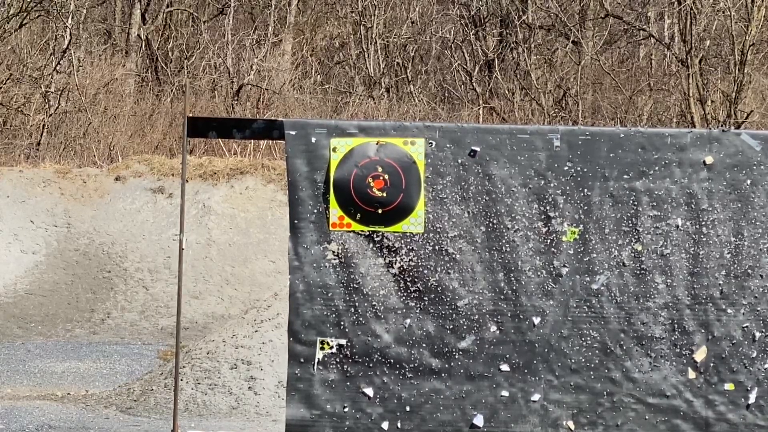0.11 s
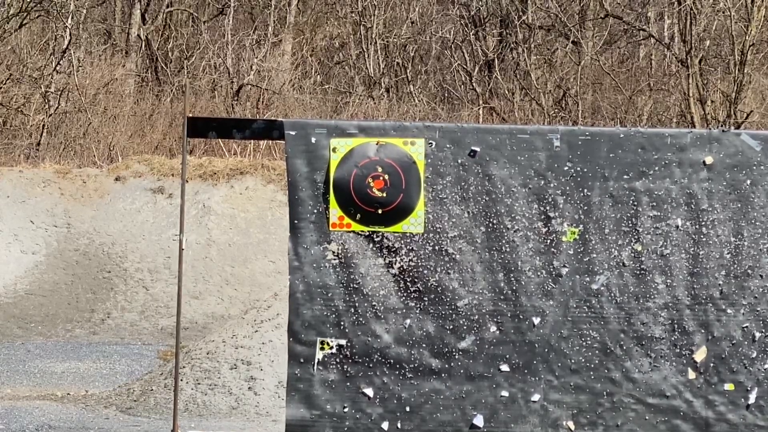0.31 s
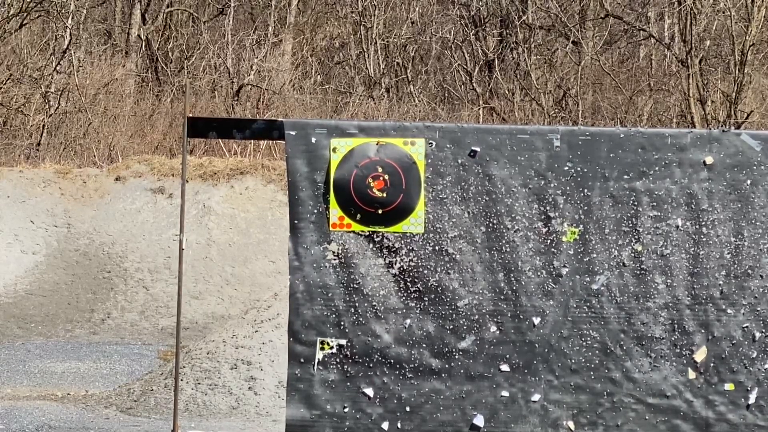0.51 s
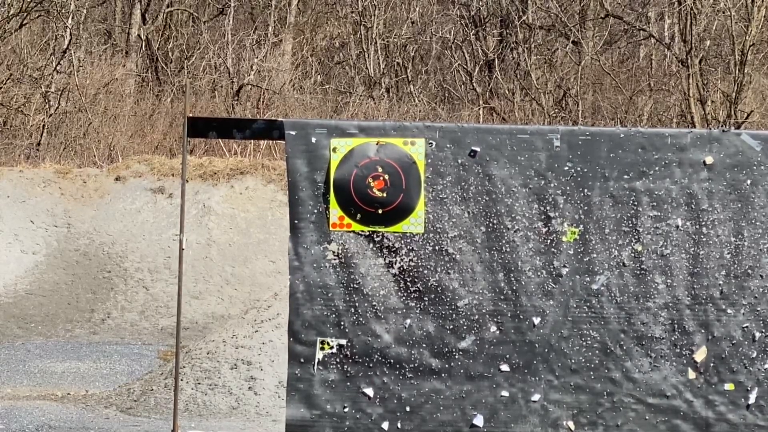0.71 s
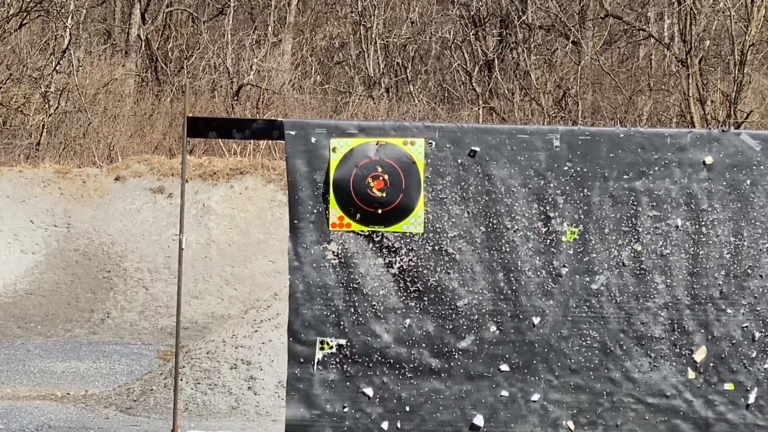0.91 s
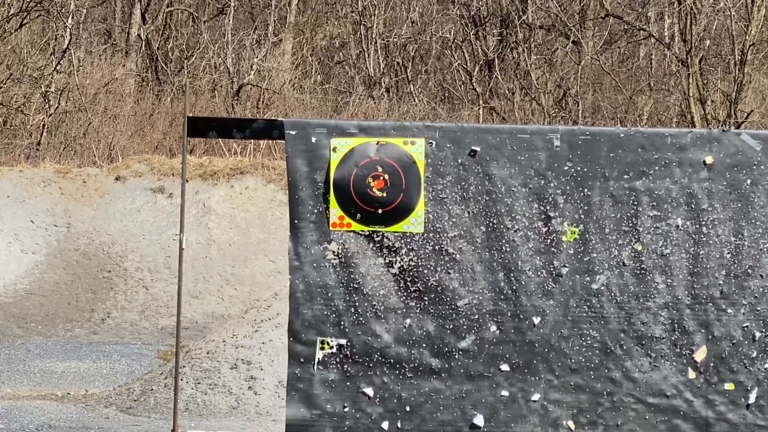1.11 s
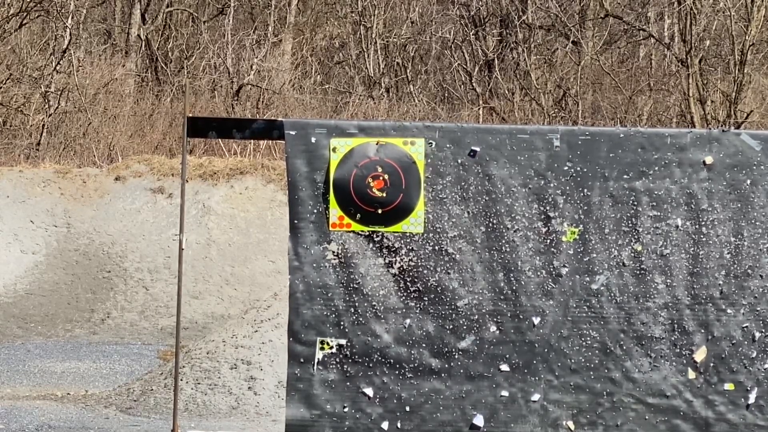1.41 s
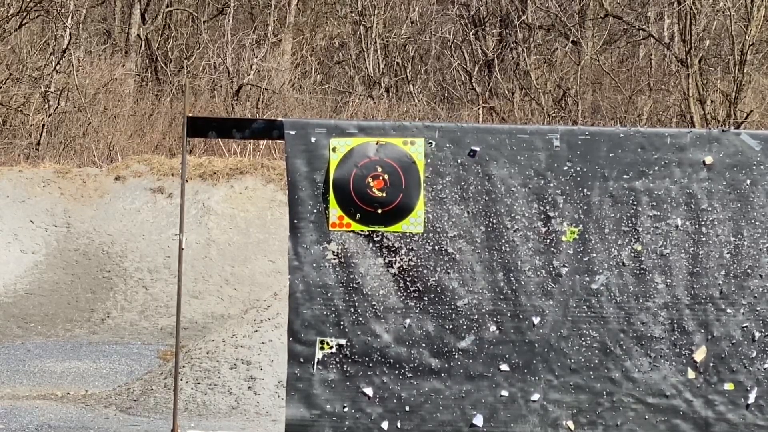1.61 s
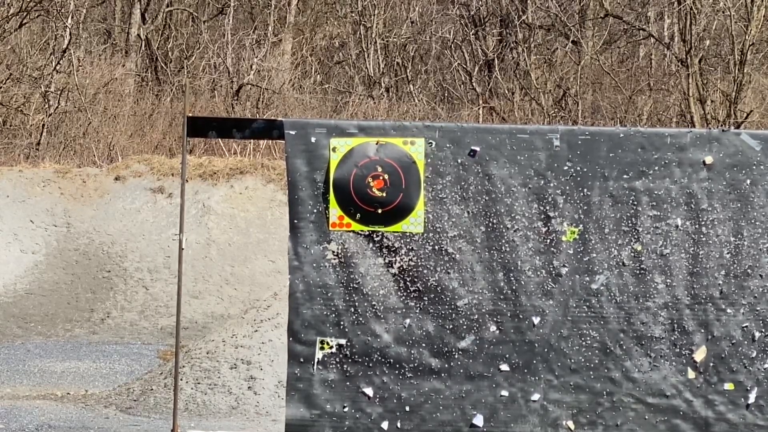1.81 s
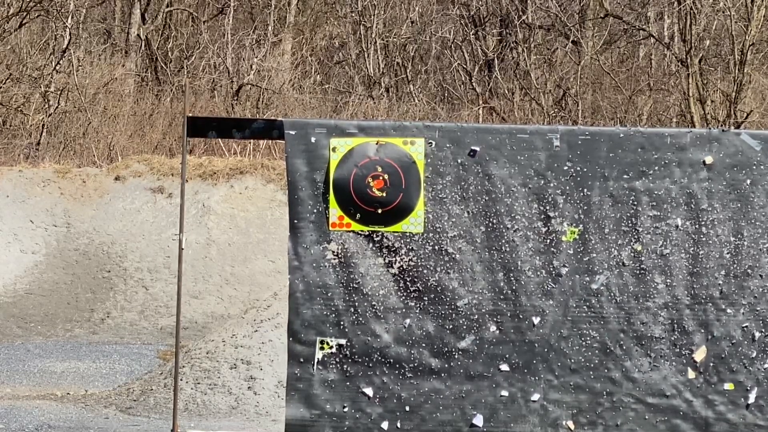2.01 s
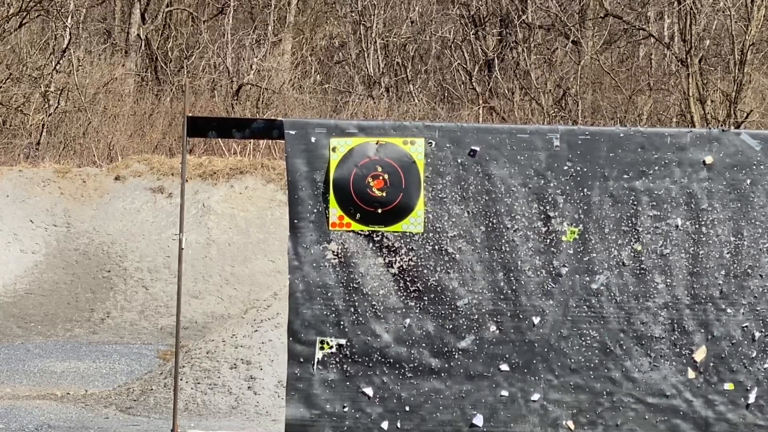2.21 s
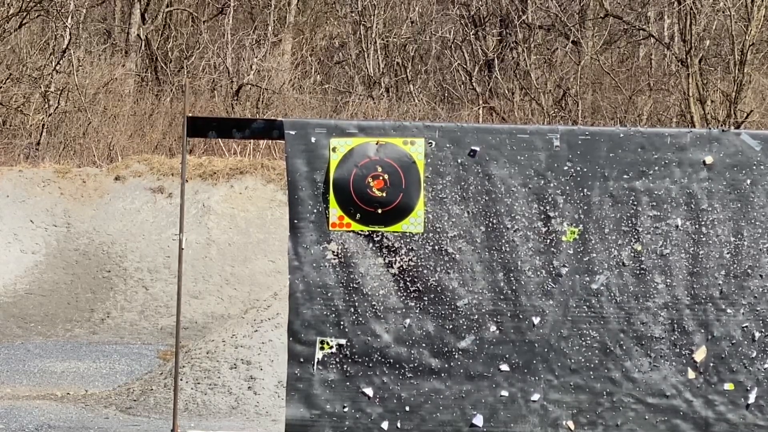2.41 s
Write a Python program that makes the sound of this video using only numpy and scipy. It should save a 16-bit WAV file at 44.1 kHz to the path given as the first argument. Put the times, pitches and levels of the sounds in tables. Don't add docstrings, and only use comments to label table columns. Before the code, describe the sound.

Single sharp muffled pistol shot with metallic slide clack, outdoor echo, and a bouncing brass case

```python
import sys
import numpy as np
from scipy import signal
from scipy.io import wavfile

SR = 44100
rng = np.random.default_rng(int(sys.argv[2]) if len(sys.argv) > 2 else 0)


def gain_from_db(level_db):
    decades = np.asarray(level_db, float) / 20
    return 10 ** decades


def bounce(signal):
    frames = np.transpose(np.atleast_2d(signal))
    limited = np.clip(frames, -1, 1)
    pcm = np.round(limited * 32767).astype(np.int16)
    wavfile.write(sys.argv[1], SR, pcm)


N = 114660
TIME = np.arange(N) / SR
SHOT_S = .2238


def at_hz(points, hz):
    table_hz, values = np.array(points).T
    return np.interp(np.log(hz), np.log(table_hz), values)


def rms_one(x):
    return x / np.sqrt(np.mean(x ** 2) + 1e-20)


def drift(rate_hz):
    hop = 40
    pole = np.exp(-2 * np.pi * rate_hz * hop / SR)
    noise = rng.standard_normal(N // hop + 2002)
    slow = signal.lfilter([1], [1, -2 * pole, pole * pole], noise)[2000:]
    return np.interp(np.arange(N) / hop, np.arange(len(slow)), rms_one(slow))


def clicks(times, gains):
    out = np.full(N, 1e-18)
    np.add.at(out, (np.asarray(times) * SR).astype(int), gains)
    return out


def ring(x, hz, t60):
    radius, turn = gain_from_db(-60 / (t60 * SR)), 2 * np.pi * hz / SR
    return signal.lfilter([0, np.sin(turn)], [1, -2 * radius * np.cos(turn), radius * radius], x)


def struck(events):
    return sum(ring(clicks([s], gain_from_db(db)), hz, t60) for s, hz, db, t60 in events)


def dying(start, rise, t60, hold=0):
    t = np.maximum(TIME - start, 0)
    return np.minimum(t / rise, 1) * gain_from_db(-60 * np.maximum(t - rise - hold, 0) / t60)


def bands(spectrum, shape):
    lowest, highest = spectrum[0][0], spectrum[-1][0]
    edges = lowest * 2 ** np.arange(0, np.log2(highest / lowest) + .2, 1 / 3)
    white = rng.standard_normal((2, N + 8000))
    out, power = 0, 0
    for k, (low, high) in enumerate(zip(edges, np.minimum(edges[1:], .45 * SR))):
        hz = np.sqrt(low * high)
        band_pass = signal.butter(2, [low, high], "band", fs=SR, output="sos")
        band = gain_from_db(at_hz(spectrum, hz)) * signal.sosfilt(band_pass, white[k % 2])[-N:]
        out = out + band * shape(hz)
        power += np.mean(band ** 2)
    return out / np.sqrt(power)


# (time [s], peak level [dB], pulse length [ms])
PULSES = [(.2241, -14, .12), (.2255, -2.5, .13), (.2267, -2.5, .12), (.2281, -7, .35), (.2292, -8, .15),
          (.2301, -5, .15), (.2319, -10, .4), (.2347, -11, .2), (.2363, -11, .2), (.2443, -16, .3),
          (.2550, -20, .4), (.2635, -24, .17), (.2828, -24, .12)]


def pressure_pulses():
    out = np.zeros(N)
    for s, db, ms in PULSES:
        t = (TIME - s) / (ms / 1000)
        out += gain_from_db(db) * 2.33 * t * np.exp(-2 * t ** 2)
    return out


# (frequency [Hz], level [dB], t60 [s])
STEEL_MODES = [(640, -24, .04), (809.6, -22.5, .04), (854, -25.5, 0.055), (1500, -24, 0.023),
               (1746, -21.5, 0.078), (2599.4, -20.5, .02), (2971, -21, .02), (4324, -21.5, 0.02),
               (4760, -20, .015), (6020, -38, .2), (6650, -24.5, 0.017), (10020, -31, 0.05)]
# (time [s], frequency [Hz], level [dB], t60 [s])
SLIDE_STOPS = [
    (0.2286, 5950, -10.5, 0.01),
    (0.2293, 6000, -10, 0.0091),
    (0.2327, 5900, -14.5, 0.011),
    (.2625, 10020, -31.5, 0.08),
    (0.2631, 6020, -27.5, 0.13),
]


def steel():
    s, db, _ = np.transpose(PULSES)
    out = struck(SLIDE_STOPS)
    for hz, mode_db, t60 in STEEL_MODES:
        blow_db = db + mode_db - 2 + rng.normal(0, 4, len(s))
        sign = rng.choice([-1, 1], len(s))
        out += ring(clicks(s, gain_from_db(blow_db) * sign), hz, t60)
    return out


# (frequency [Hz], density [dB per Hz])
GAS_COLOUR = [(180, -40), (300, -16), (1090, -16.5), (1740, -5), (4030, -9.5), (5830, -0.5), (10500, -19),
              (15200, -22.5), (16500, -35)]


def gas():
    spits = sum(gain_from_db(db) * dying(s, .00044, .011) for s, db, _ in PULSES)
    jet = gain_from_db(-9) * bands(GAS_COLOUR, lambda hz: spits)
    bright = np.diff(rng.standard_normal(N + 1))
    return jet + gain_from_db(-20) * bright * dying(SHOT_S, .0003, .012, hold=.001)


def muzzle_puff():
    start_s, pitch_hz = .2312, 125
    swing = np.sin(2 * np.pi * pitch_hz * (TIME - start_s))
    return -gain_from_db(-18.5) * swing * dying(start_s, .0046, .03, hold=.009)


# (time [s], level [dB], frequency [Hz], t60 [s])
BANK_THUMPS = [
    (0.3887, -36, 454, 0.026),
    (.3885, -32.5, 850, 0.0087),
    (0.3965, -42, 151, 0.065),
    (0.41, -43.5, 308, 0.023),
]


def bank_thumps():
    soft = signal.butter(2, 1500, fs=SR, output="sos")
    rings = sum(ring(clicks([s], gain_from_db(db)), hz, t60) for s, db, hz, t60 in BANK_THUMPS)
    return -signal.sosfilt(soft, rings)


# (frequency [Hz], density [dB per Hz])
NEAR_COLOUR = [(88, -36.5), (150, -3), (376, -15), (774, 0.5), (1310, -10), (1720, -3), (3700, -7.5),
               (5910, -5.5), (16000, -19)]
# (frequency [Hz], t60 [s])
NEAR_DECAY = [(200, 0.36), (700, .22), (2000, 0.24), (6000, 0.26), (10000, 0.14), (15000, .24)]


def near_tail():
    bank = gain_from_db(-33) * dying(.337, .056, .26)

    def shape(hz):
        fall = dying(SHOT_S + .008, .0061, at_hz(NEAR_DECAY, hz))
        return fall * gain_from_db(3.2 * drift(60)) + bank

    return gain_from_db(-22) * bands(NEAR_COLOUR, shape)


# (frequency [Hz], density [dB per Hz])
FAR_COLOUR = [(350, -17), (700, -3), (1500, -5.5), (2800, -4.5), (4500, -12.5), (5700, -10), (7500, -17.5),
              (11000, -31.5)]
# (frequency [Hz], t60 [s])
FAR_DECAY = [(500, 1.7), (1500, 1.3), (2800, 1.14), (4500, 1.1), (7500, 0.52), (11000, 0.31)]


def far_tail():
    def shape(hz):
        return dying(SHOT_S + .04, .12, at_hz(FAR_DECAY, hz)) * gain_from_db(1.2 * drift(15))

    wash = gain_from_db(-55.5) * bands(FAR_COLOUR, shape)
    whistle = rms_one(ring(rng.standard_normal(N), 5620, .008))
    return wash + gain_from_db(-84) * whistle * dying(.615, .02, 1)


# (time [s], frequency [Hz], level [dB], t60 [s])
CASE_BRUSHES = [
    (0.8961, 4410, -70, .004),
    (0.9941, 3900, -58.5, 0.0066),
    (0.9954, 5200, -64.5, .006),
    (0.9974, 3704, -68, 0.0068),
    (1.2244, 3750, -74, 0.011),
]


def case_brushes():
    return struck(CASE_BRUSHES)


# (time [s], mouth pop level [dB], mouth pitch [Hz], tick level [dB], wall ring level [dB])
LANDINGS = [(1.232, -48, 5200, -44, -64), (1.683, -46, 5480, -48, -70), (1.741, -68, 5600, -62, -90),
            (1.9034, -55, 5620, -54, -74), (2.030, -59, 5650, -56, -76), (2.153, -68, 4900, -64, -80),
            (2.160, -66, 4900, -66, -82), (2.205, -72, 5450, -72, -82), (2.237, -76, 5430, -78, -80),
            (2.307, -76, 5600, -72, -78), (2.316, -74, 5550, -80, -95), (2.326, -73, 5600, -80, -95),
            (2.354, -72, 5410, -76, -95), (2.412, -78, 5430, -85, -100)]
# (frequency [Hz], level [dB], t60 [s])
WALL_MODES = [(12610, -0.5, 0.052), (12700, -3.5, 0.047), (15900, -10, 0.017), (15200, -8, .015)]
# (time [s], frequency [Hz], level [dB], t60 [s])
RIM_RINGS = [
    (2.0355, 11520, -58, 0.056),
    (2.0355, 12030, -61, 0.016),
    (2.047, 11560, -56, 0.053),
    (2.047, 10520, -78, 0.033),
    (2.05, 13450, -85, .05),
]


def case_landings():
    s, pop_db, mouth_hz, tick_db, wall_db = np.transpose(LANDINGS)
    tones = struck(RIM_RINGS)
    for start, db, hz in zip(s, pop_db, mouth_hz):
        tones += ring(clicks([start], gain_from_db(db)), hz, .009)
        tones += ring(clicks([start], gain_from_db(db - 1)), hz * 1.103, .009)
    for hz, db, t60 in WALL_MODES:
        tones += ring(clicks(s, gain_from_db(wall_db + db)), hz, t60)
    bright = signal.butter(2, 4300, "high", fs=SR, output="sos")
    tick = signal.sosfilt(bright, ring(clicks(s, gain_from_db(tick_db)), 7000, .0005))
    return tones, tick


# (delay [s], level [dB])
SHELTER_RETURNS = [
    (.0072, -25),
    (.0090, -22),
    (.018, -33),
    (.024, -30),
    (.028, -33),
]


def shelter_answer(tones, tick):
    envelope = gain_from_db(-33) * dying(.0018, .0085, .26)
    envelope += sum(gain_from_db(db) * dying(delay, .0005, .014) for delay, db in SHELTER_RETURNS)
    space = rng.standard_normal(N) * envelope
    sent = gain_from_db(-5) * tones + gain_from_db(4) * tick
    return signal.fftconvolve(sent, space[:SR // 2])[:N]


# (time [s], level [dB])
FIRST_GUST = [
    (0, -43.5),
    (.18, -67),
    (.36, -55.5),
]
# (time [s], level [dB])
LATER_GUSTS = [(0.5, -58.5), (0.77, -44.5), (0.9, -55), (0.92, -48.5), (1.04, -56), (1.2, -39.5),
               (1.27, -58.5), (1.74, -49), (1.84, -60), (1.89, -49), (2.0, -63.5), (2.08, -54.5),
               (2.29, -63.5), (2.32, -50), (2.6, -72.5)]
# (frequency [Hz], density [dB per Hz])
WIND_COLOUR = [(13, -34), (22, -11), (46, 2), (70, 4.5), (144, -12.5), (189, -30), (216, -27.5), (260, -41),
               (340, -72.5), (570, -120)]


def wind():
    gust_db = np.interp(TIME, *np.transpose(list(FIRST_GUST) + list(LATER_GUSTS)))
    lumps = drift(12)
    return gain_from_db(gust_db) * bands(WIND_COLOUR, lambda hz: gain_from_db(.5 * lumps + 1.5 * drift(8)))


# (frequency [Hz], density [dB per Hz])
AIR_COLOUR = [(110, -15.5), (150, 0), (286, -19), (612, -21), (837, -13), (2310, -35), (9000, -48.5),
              (16500, -55.5)]


def far_traffic():
    return gain_from_db(-69.5) * bands(AIR_COLOUR, lambda hz: gain_from_db(.7 * drift(2.4)))


def scene():
    shot = pressure_pulses() + steel() + gas() + muzzle_puff()
    echoes = bank_thumps() + near_tail() + far_tail()
    tones, tick = case_landings()
    case = case_brushes() + tones + tick + shelter_answer(tones, tick)
    return (shot + echoes + case + wind() + far_traffic())[None]


def band_limit(x):
    return signal.sosfilt(signal.butter(12, 17040, fs=SR, output="sos"), x)


def record(dry):
    rounded = .95 * np.tanh(dry / 1.011)
    top_cut = signal.ellip(8, .5, 50, 15900, fs=SR, output="sos")
    return band_limit(signal.sosfilt(top_cut, rounded))


dry = scene()
out = record(dry)
bounce(out)
```